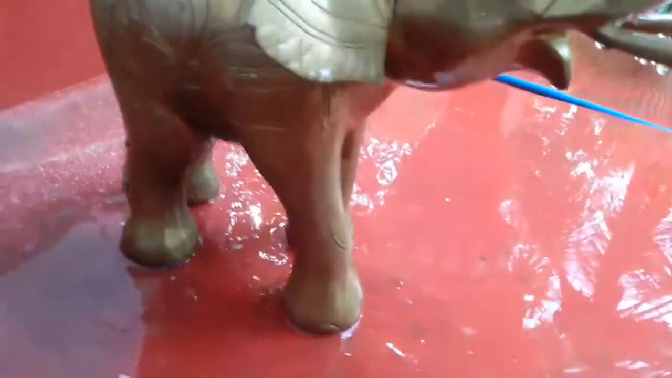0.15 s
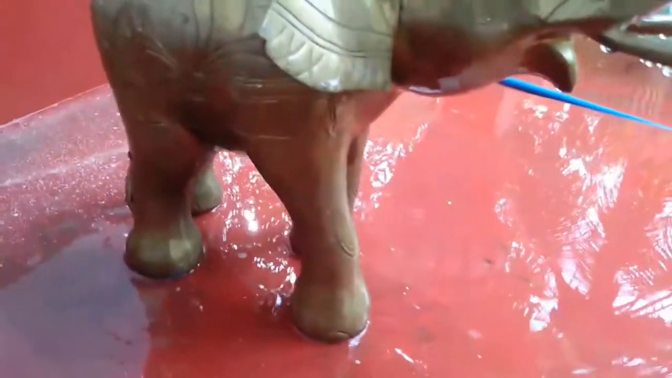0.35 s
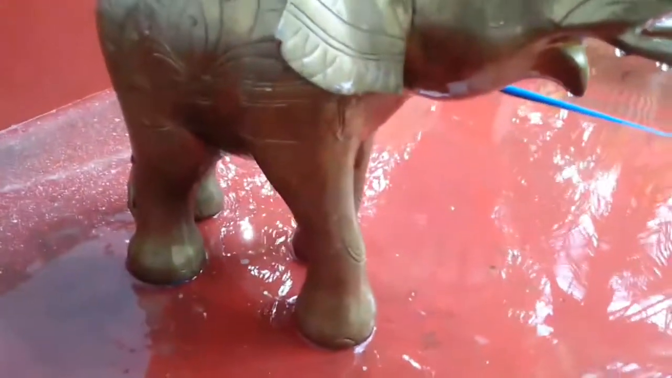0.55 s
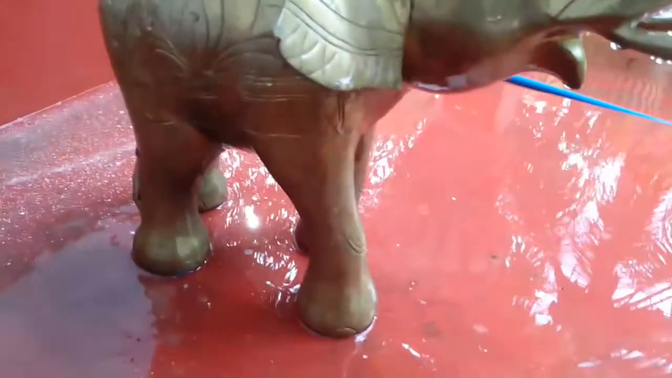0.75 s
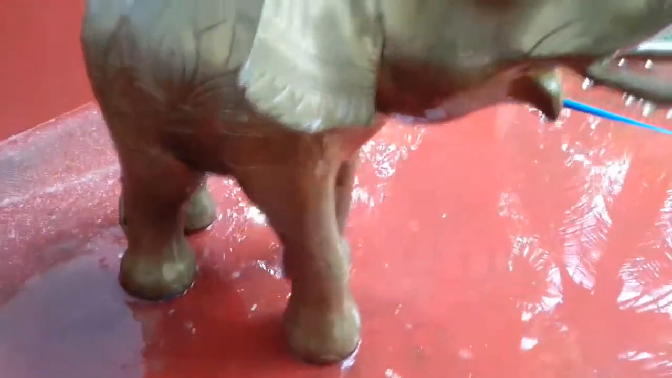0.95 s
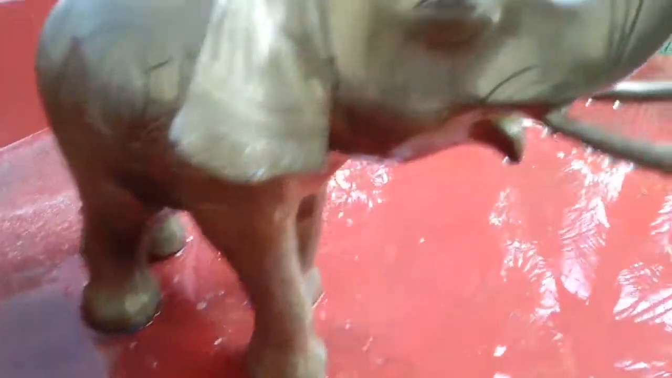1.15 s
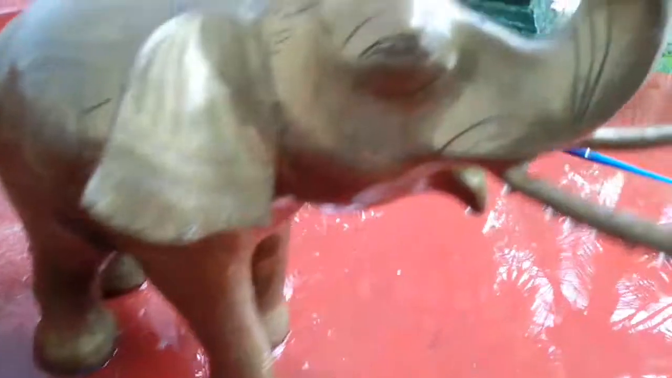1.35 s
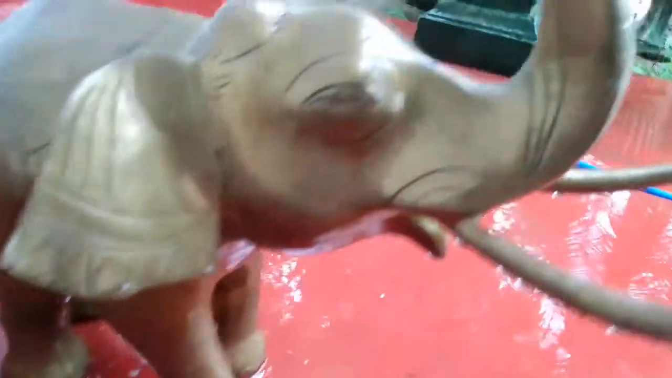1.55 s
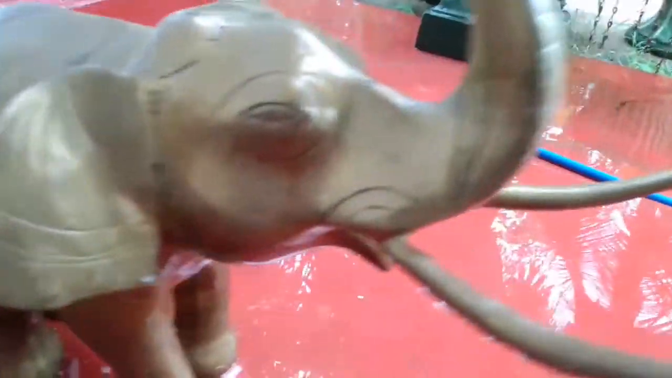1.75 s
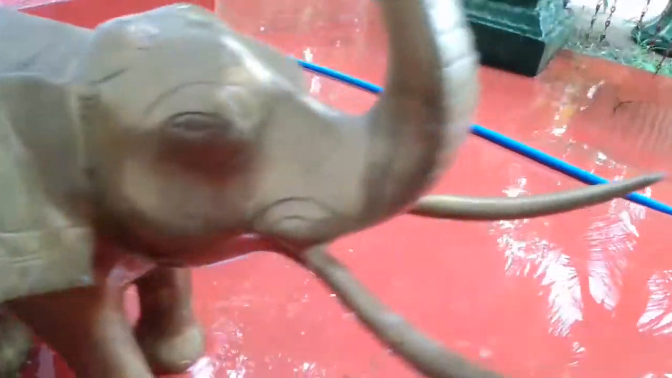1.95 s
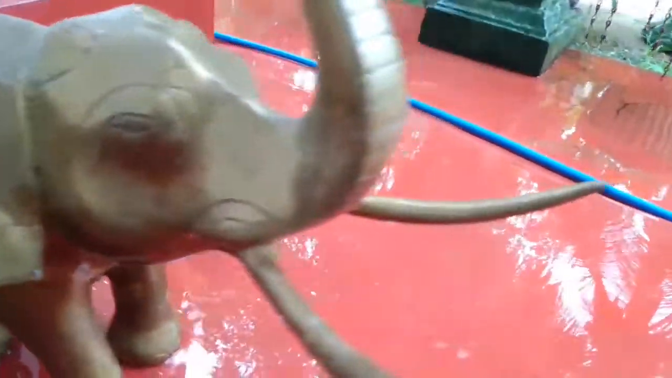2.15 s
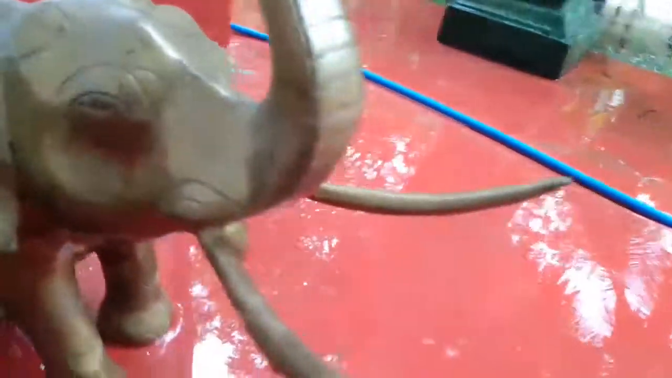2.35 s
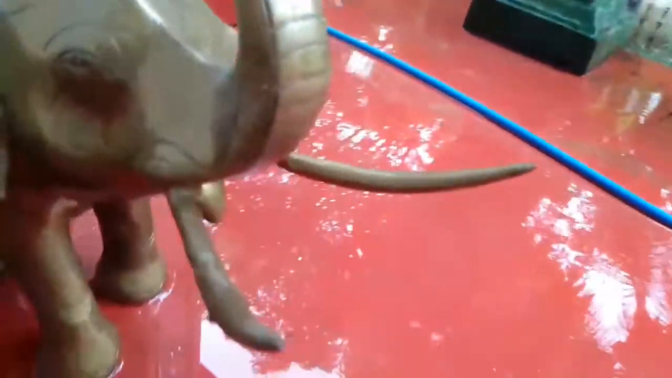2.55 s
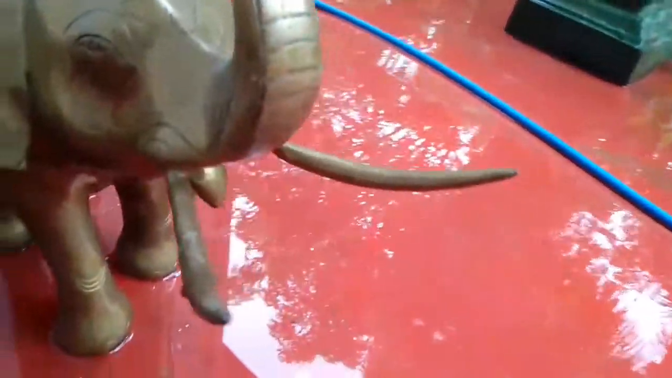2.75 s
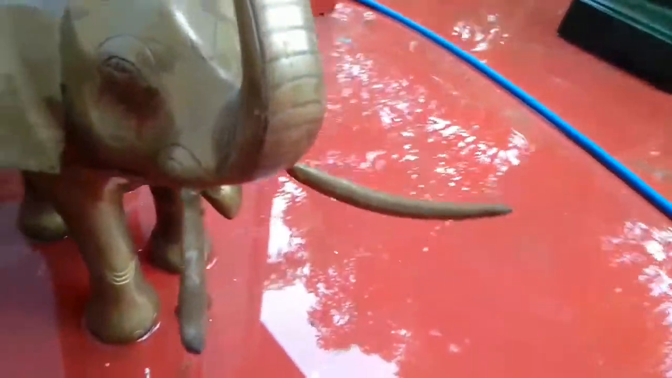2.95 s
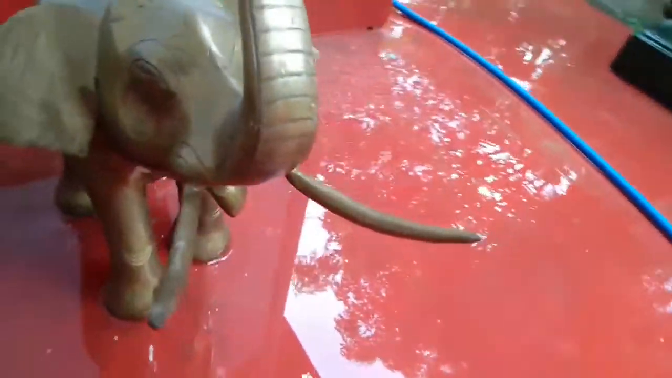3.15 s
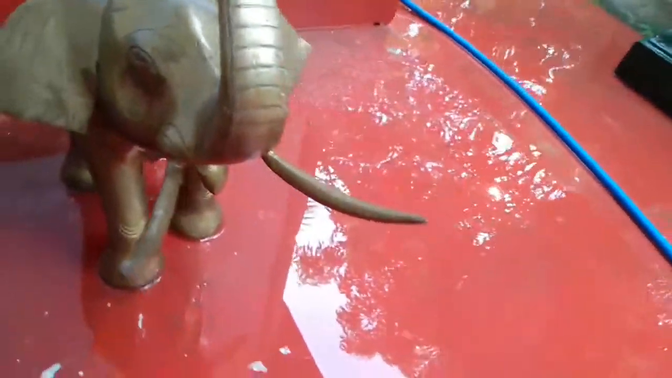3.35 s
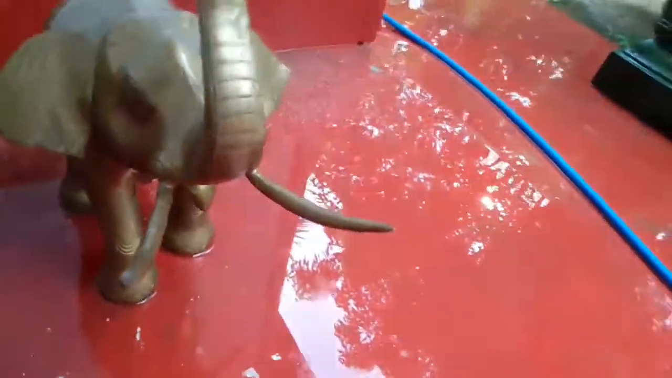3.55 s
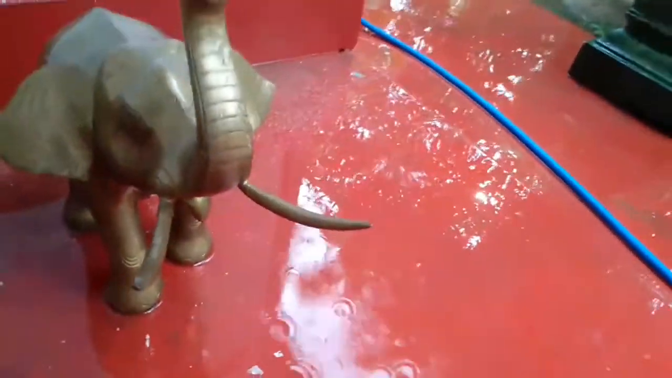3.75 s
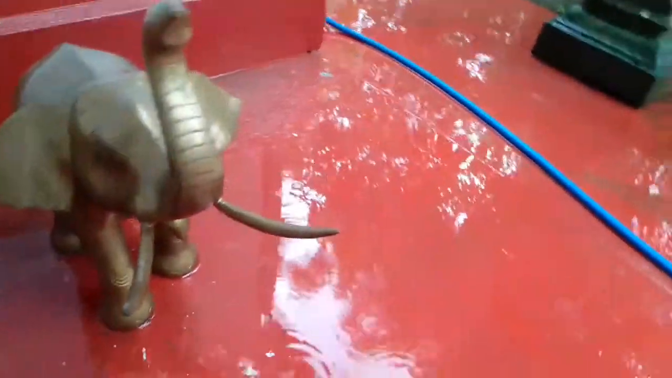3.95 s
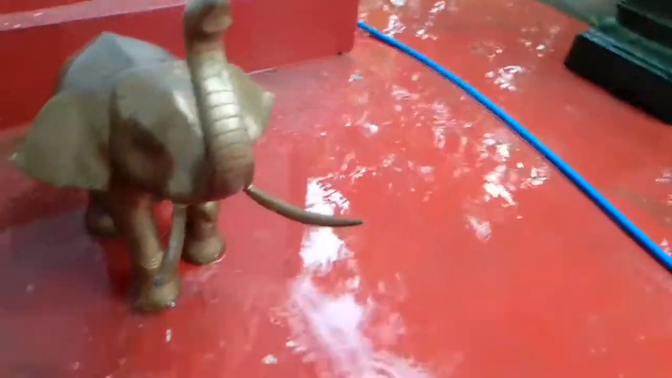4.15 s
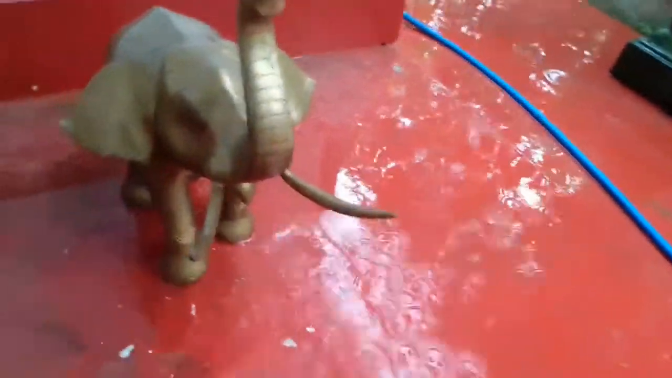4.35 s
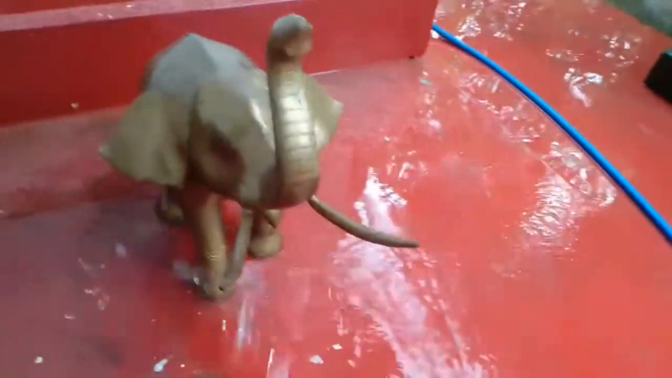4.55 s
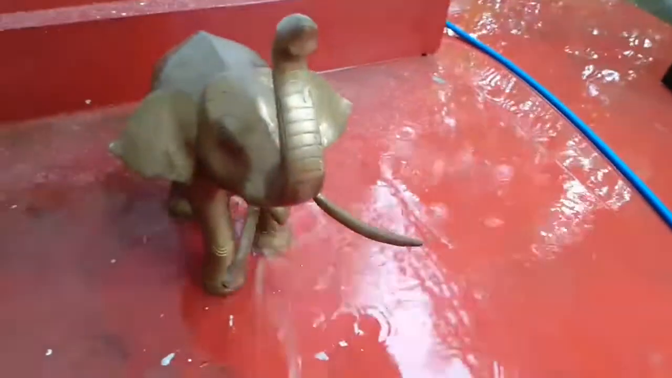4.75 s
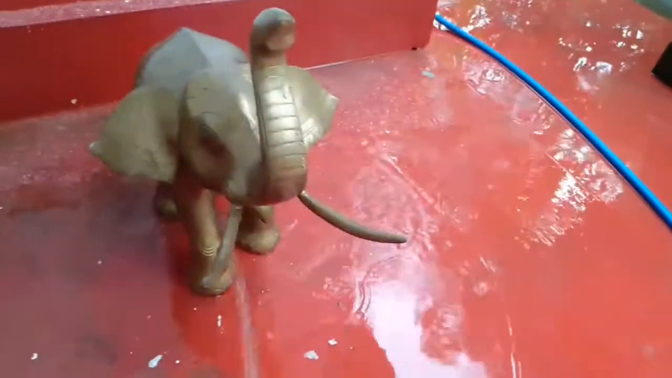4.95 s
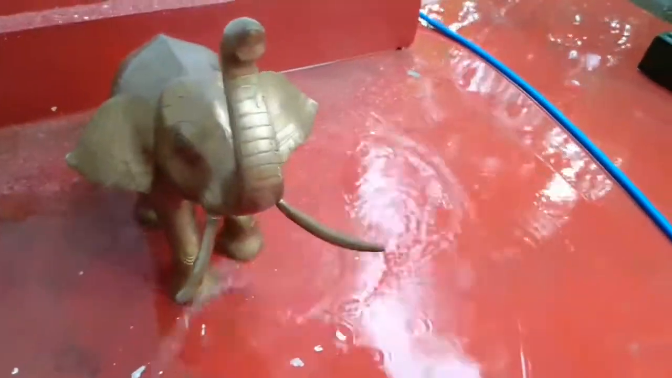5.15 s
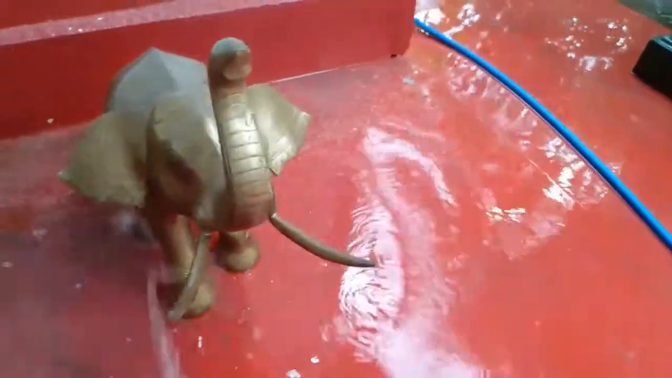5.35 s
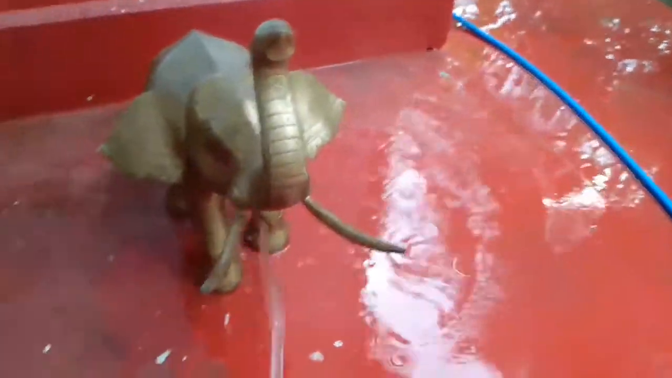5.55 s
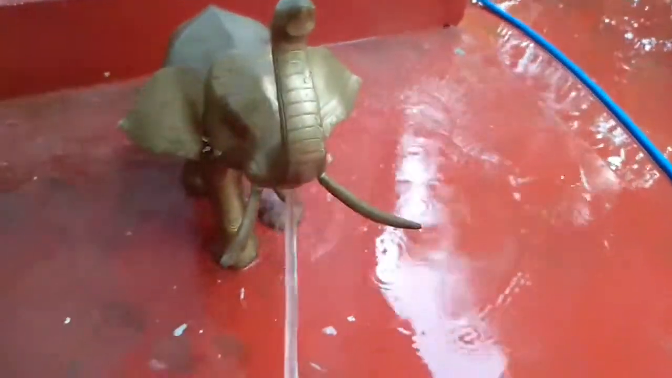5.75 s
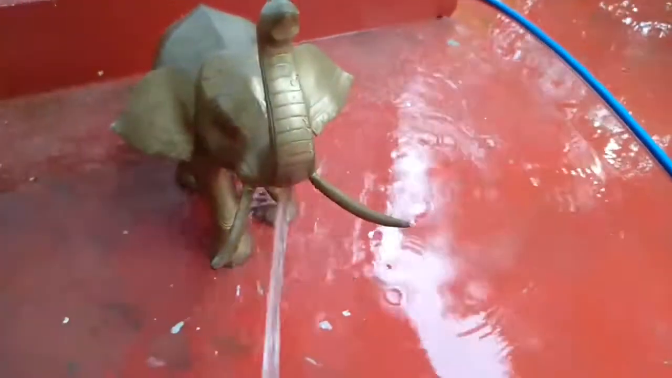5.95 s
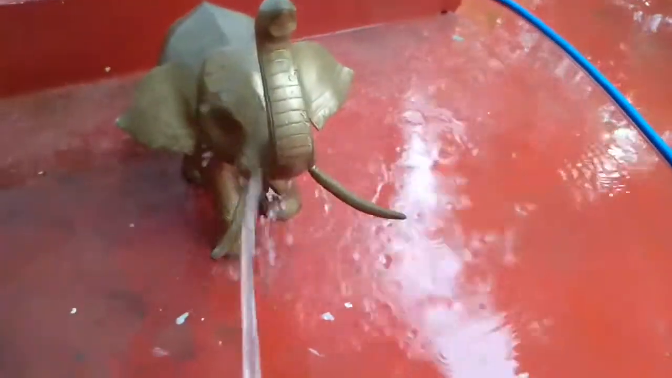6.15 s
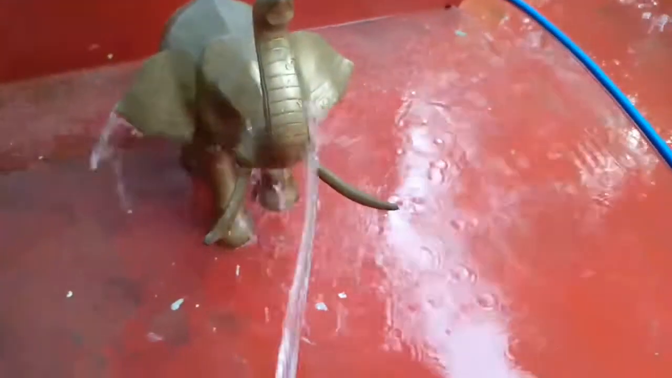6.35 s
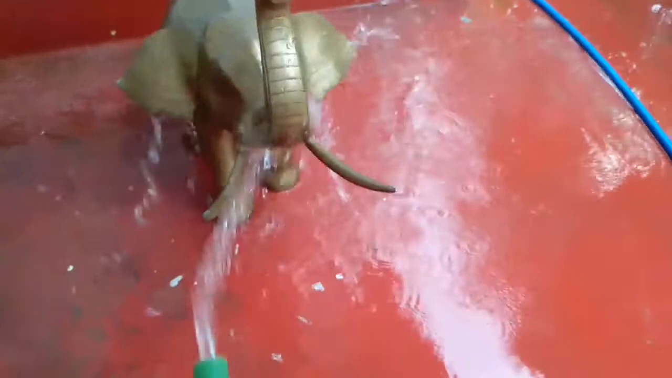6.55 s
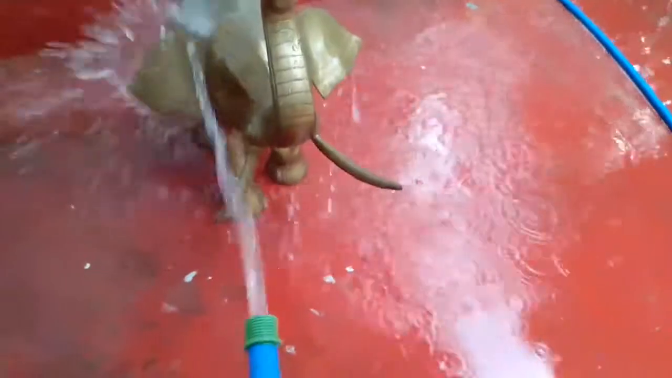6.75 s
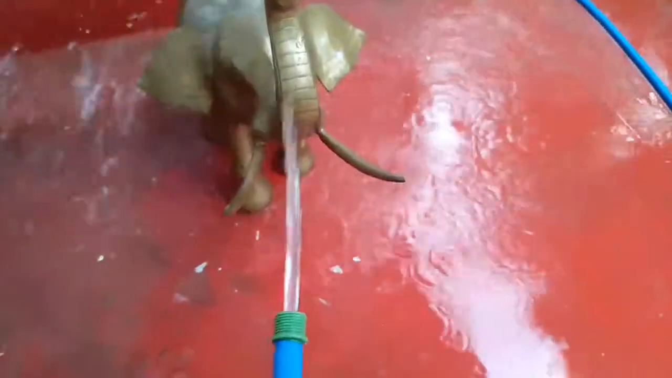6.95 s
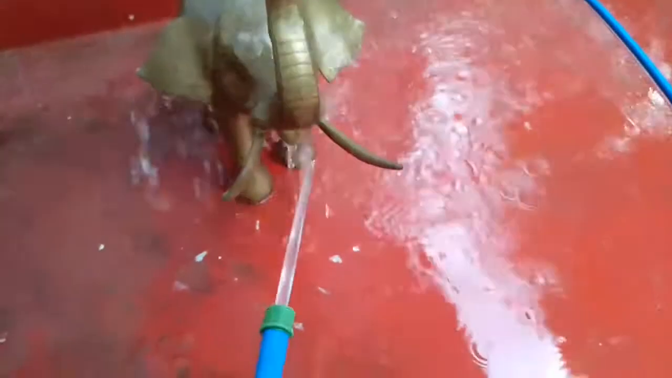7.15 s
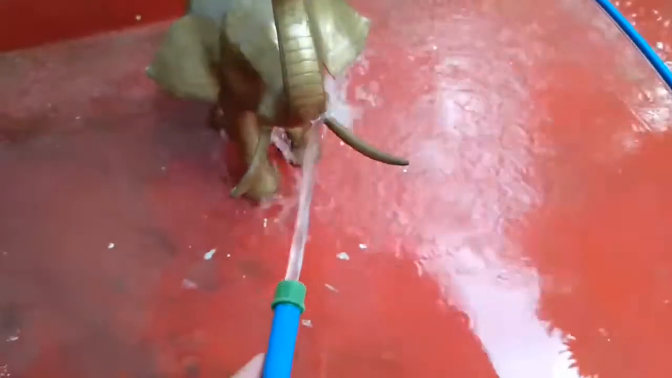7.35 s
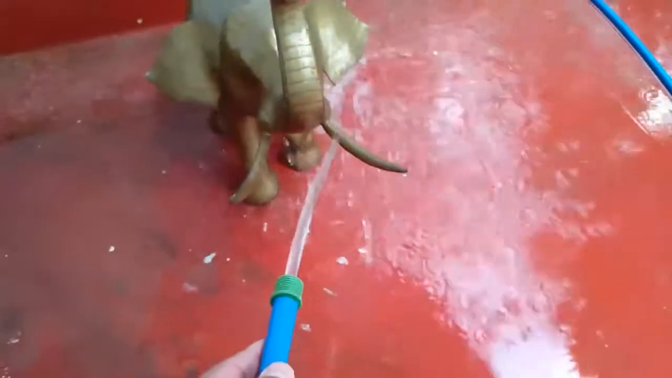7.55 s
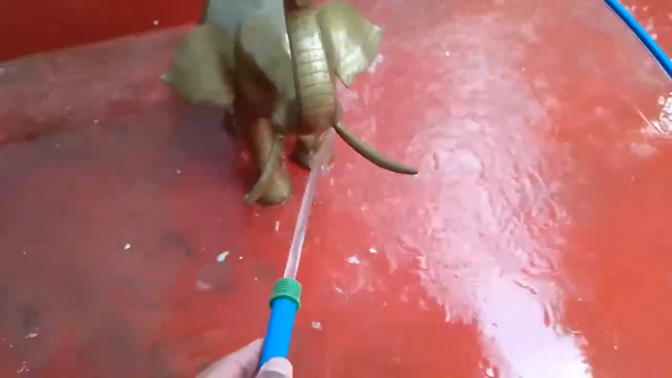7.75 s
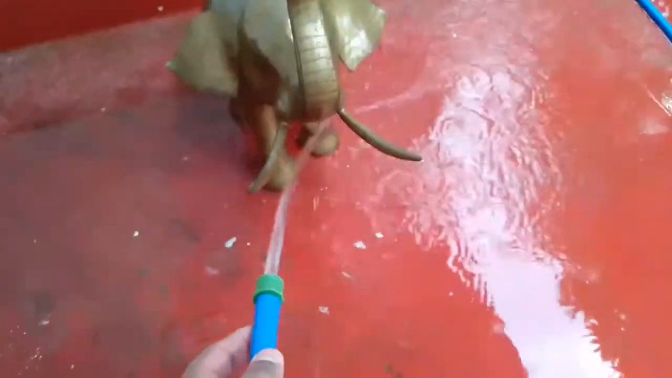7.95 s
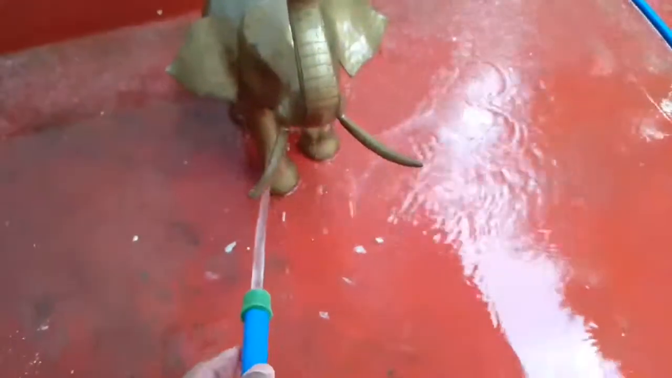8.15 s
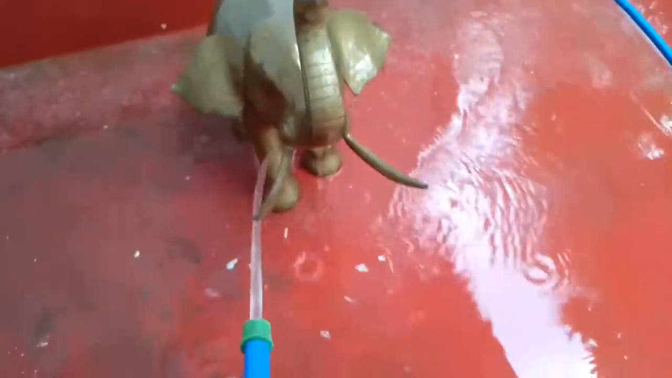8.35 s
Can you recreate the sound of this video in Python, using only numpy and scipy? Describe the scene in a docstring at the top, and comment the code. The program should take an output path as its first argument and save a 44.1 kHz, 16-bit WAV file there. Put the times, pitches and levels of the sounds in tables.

```python
"""A garden hose spits air and water, then plays on a metal statue and a wet porch floor.
Filtered random clicks make its hiss, sizzle, splash and patter; noise bursts make pops and slaps; sines ring as bubbles.
Insects trill and whine on narrow noise and a wavering sine, and a bird squeaks hoarsely, a falling whistle under noise.
A far horn, a wavering sine, sounds once over a low rumble, drone, hush, insect chorus and swells of filtered noise."""
import sys
import numpy as np
from scipy import signal
from scipy.fft import rfft, irfft, next_fast_len
from scipy.io import wavfile
from scipy.ndimage import uniform_filter1d

SR = 44100
rng = np.random.default_rng(int(sys.argv[2]) if len(sys.argv) > 2 else 0)


def unload_wav(signal):
    """Save mono or channel-first audio to the path in sys.argv[1] as 16-bit WAV at rate SR, clipped to [-1, 1]."""
    wavfile.write(
        sys.argv[1],
        SR,
        np.round(np.clip(np.atleast_2d(signal).T, -1, 1) * 32767).astype(np.int16),
    )


N = 374843
T = np.arange(N) / SR  # time in s

# Levels in the tables are relative: each source trims or modulates its own.
# bird notes: [t/s, length/s, final f/Hz, level/dB, top of the rasp f/Hz]
BIRD_NOTES = [(-.08, 0.088, 2680, -40.5, 3300), (1.062, 0.13, 2676, -45, 3470),
              (1.28, .16, 2700, -43.5, 3800), (1.506, 0.19, 2585, -43.5, 3580),
              (1.968, 0.18, 2314, -44, 3100), (2.561, 0.13, 2316, -45.5, 2720),
              (2.8, 0.11, 2384, -44.5, 2810), (7.084, 0.11, 2303, -61, 2660),
              (8.041, 0.094, 2466, -57, 2870)]
# trilling insect: [t/s, f/Hz, level/dB]
INSECT_TRILL = [(0, 5660, -59.5), (.5, 5820, -77), (1.1, 5580, -58), (1.9, 5480, -77), (2.95, 6000, -58),
                (3.35, 5556, -58), (4.1, 5765, -61.5), (7.1, 5685, -58), (8.5, 5570, -55.5)]
# second insect with a pure, thin note: [t/s, f/Hz, level/dB]
INSECT_WHINE = [(0, 5690, -71), (.9, 5670, -59.5), (1.4, 5580, -64), (3.3, 5750, -62.5), (4, 5684, -55.5),
                (6.4, 5600, -59.5), (7.2, 5670, -54), (8.5, 5490, -60.5)]
# outdoor hush, which the insect chorus follows: [t/s, level/dB]
HUSH_LEVEL = [(0, -6.5), (1.05, -4), (1.3, 3), (1.65, 1.5), (1.9, -6), (2.1, 1.5), (2.38, 1.5),
              (2.55, -4.5), (3.45, -5.5), (3.76, -13), (3.9, 7), (4.3, -2.5), (5.5, 1), (6.45, -4.5),
              (6.85, -1.5), (7.8, 1), (8.1, -8), (8.5, 1)]
# dull drone under the hush: [t/s, level/dB]
DRONE_LEVEL = [(0, -103), (1, -78), (1.3, -65), (5.5, -62), (6.6, -62), (8.5, -65)]
# soft low swells from far off: [t/s, length/s, centre f/Hz, width f/Hz, level/dB]
FAR_SWELLS = [(0.37, 0.81, 114.6, 70.6, -56.5), (2.25, 0.33, 476, 310, -60.5), (3.104, 0.22, 490, 87, -60),
              (2.8, 0.63, 350, 41, -66)]
# far horn: [t/s, f/Hz, level/dB]
HORN_NOTE = [(3.2, 1360, -81), (3.4, 1361, -70), (3.83, 1370, -64.5), (3.87, 1364, -47),
             (4.03, 1380, -50.5), (4.07, 1360, -59), (4.45, 1396, -60.5), (4.65, 1415, -72)]
# changing flow of the hose, spray and splash swell and fade: [t/s, nozzle spray level/dB, splash level/dB]
JET_FLOW = [(3.28, -60, -75), (3.42, -40, -77), (3.72, -47.5, -63), (3.85, -44.5, -53.5), (4.2, -69, -68.5),
            (4.53, -65, -80), (4.71, -42.5, -43), (5.1, -43, -45), (5.45, -49, -50.5), (5.9, -41, -49),
            (6.22, -40, -56.5), (6.43, -52.5, -65), (6.66, -33.5, -48), (7.04, -44, -58), (7.3, -45, -68),
            (7.47, -34, -44), (7.83, -31, -43.5), (8.15, -65.5, -64)]
# surges as trapped air drives the water out: [t/s, spray level/dB, splash level/dB, decay/s]
JET_SURGES = [(3.77, -47, -48.5, .06), (4.22, -60, -49.5, 0.087), (4.315, -45, -58.5, 0.039),
              (4.561, -44, -56, 0.16), (4.875, -39, -43.5, 0.15), (5.043, -36, -40, 0.024),
              (5.158, -36.5, -45, 0.089), (5.299, -28, -38.5, 0.041), (5.483, -30, -38.5, 0.068),
              (5.609, -35, -40.5, 0.039), (5.75, -32.5, -41, 0.033), (6.445, -37.5, -57, 0.034),
              (6.779, -43, -45.5, 0.19), (7.335, -36, -53, 0.11), (8.195, -36.5, -46.5, 0.39),
              (8.32, -48, -49, 0.074)]
# the stream sweeps over bare floor: [t/s, length/s, patter level/dB]
FLOOR_SWEEPS = [(4.0, 0.079, -47.5), (4.23, 0.15, -57.5), (4.637, 1.34, -48), (6.793, .24, -50),
                (7.456, 0.25, -57), (8.37, .14, -50.5)]
# air pockets popping at the nozzle: [t/s, level/dB]
AIR_POPS = [(3.5302, -22), (3.5568, -13), (3.652, -17.5), (3.7795, -9.5), (4.0498, -20), (4.6812, -11),
            (4.805, -15), (4.8206, -5.5), (5.175, -14), (5.3013, -20), (6.0765, -14.5), (6.177, -16),
            (6.2457, -13), (6.3924, -21), (6.4463, -14.5), (6.5691, -13.5), (6.6751, -11), (6.7825, -10.5),
            (6.962, -24), (7.108, -16.5), (7.2835, -21), (7.344, -17.5), (7.4054, -9), (7.5824, -11.5),
            (7.703, -9.5), (8.2012, -12), (8.3274, -8)]
# slugs of water landing: [t/s, level/dB, cavity f/Hz]
WATER_SLUGS = [(3.775, -25, 3100), (4.2248, -31, 3540), (4.243, -25.5, 4240), (4.6187, -29, 2800),
               (4.6527, -23.5, 2660), (4.6844, -21, 3580), (4.699, -21.5, 1560), (4.772, -24, 2900),
               (4.8238, -15, 2720), (4.8615, -18.5, 3200), (4.883, -23.5, 1390), (4.9094, -20.5, 5040),
               (5.054, -23, 1810), (5.1777, -26, 2400), (5.3209, -20, 2760), (5.5162, -14, 3220),
               (5.607, -20.5, 2570), (5.7593, -22, 2600), (5.771, -22, 1770), (6.279, -31, 3540),
               (6.4768, -29.5, 3550), (6.6447, -29, 3700), (6.7116, -16.5, 3120), (6.788, -18, 3920),
               (6.913, -26, 3560), (7.464, -23, 2780), (7.712, -20, 3200), (7.8344, -24.5, 3470),
               (8.441, -27.5, 1210)]
# spectrum of the far rumble: [f/Hz, level/dB]
RUMBLE_COLOUR = [(20, -30), (50, -3.5), (65, -5.5), (76, 4.5), (90, -3.5), (150, -8), (210, -11),
                 (280, -33.5), (420, -36), (900, -30.5)]
# spectrum of the drone: [f/Hz, level/dB]
DRONE_COLOUR = [(100, -4.5), (200, 2), (300, 5.5), (350, -2.5), (420, -26), (900, -45.5)]
# spectrum of the hush: [f/Hz, level/dB]
HUSH_COLOUR = [(100, -3), (450, -4), (1000, -10), (1600, -8.5), (2300, 2.5), (3200, -3.5), (4600, -15),
               (7000, -8.5), (8500, -34), (10500, -30), (12000, -8), (13500, -39), (16000, -62)]
# spectrum of the insect chorus: [f/Hz, level/dB]
CHORUS_COLOUR = [(4900, -48.5), (5080, -1), (5220, 1.5), (5750, 8.5), (6100, 3.5), (6450, -1), (6750, 4),
                 (6950, -46), (7800, -32)]
# spectrum of air hissing at the nozzle: [f/Hz, level/dB]
AIR_COLOUR = [(3000, -27), (9000, -21.5), (10500, -18), (11400, -1.5), (12200, 1.5), (14600, -8),
              (15600, -11.5)]
# spectrum of spray at the nozzle: [f/Hz, level/dB]
SIZZLE_COLOUR = [(3000, -29), (7500, -20.5), (9300, -9.5), (10700, -4.5), (12100, 2), (13900, -7.5),
                 (15600, -9)]
# spectrum of splashing drops: [f/Hz, level/dB]
SPLASH_COLOUR = [(700, -26), (1600, -15), (2250, -2.5), (2900, 0), (4000, -4), (5300, -3.5), (7200, -7.5),
                 (10000, -14), (15000, -24)]
# spectrum of drops on the floor: [f/Hz, level/dB]
PATTER_COLOUR = [(150, -24), (320, -2.5), (800, -1), (1750, 5), (2500, 3.5), (5000, -45)]

NOTE_START = 1.12  # bird notes glide down from this multiple of their final pitch
SURGE_ATTACK_S, SURGE_HOLD_S = 0.005, 0.031
FLOOR_ATTACK_S, FLOOR_DECAY_S = 0.038, 0.069
SURGE_PATTER_DB = -35.5  # a surge that splashes this loudly doubles the patter


def undb(db):
    """Decibels to gain."""
    return 10 ** (np.asarray(db) / 20)


def unit(x):
    """Scale to rms 1."""
    return x / np.sqrt(np.mean(x ** 2) + 1e-20)


def curves(table):
    """The columns of a table, joined by lines in time."""
    s, *columns = np.transpose(table)
    return [np.interp(T, s, column) for column in columns]


def add(out, s, x):
    """Mix x into out from time s; a negative start trims the head of x."""
    i = int(s * SR)
    x, i = x[max(-i, 0):], max(i, 0)
    out[i:i + len(x)] += x[:max(N - i, 0)]


def gate(s, length, attack_s, decay_s):
    """Rise from time s, hold until the length is over, then die away."""
    rise = np.clip((T - s) / attack_s, 0, 1)
    return rise * np.exp(-np.maximum(T - s - length, 0) / decay_s)


def walk(rate):
    """Slow chance with a spread near 1."""
    k = int(SR / rate)
    steps = np.repeat(rng.standard_normal(N // k + 1), k)
    return unit(uniform_filter1d(steps, k)[:N])


def clicks(rate, spread_db):
    """Random impacts, rate per second; a positive spread makes a few large, a negative one a few faint."""
    size = undb(spread_db * np.minimum(rng.exponential(size=N), 5))
    return (rng.random(N) < rate / SR) * size * rng.choice([-1, 1], N)


def colour(x, points, size=4096):
    """Minimum-phase filter through (Hz, dB) points; the result has rms 1."""
    hz, db = np.transpose(points)
    bins = np.fft.rfftfreq(size, 1 / SR) + 1
    log_gain = np.log(undb(np.interp(np.log(bins), np.log(hz), db)))
    # folding the cepstrum onto positive time makes the filter causal
    cepstrum = irfft(log_gain)[:size // 2]
    cepstrum[1:] *= 2
    response = irfft(np.exp(rfft(cepstrum, size)))
    return unit(signal.fftconvolve(x, response)[:len(x)])


def resonate(x, hz, q):
    """One resonance."""
    return signal.lfilter(*signal.iirpeak(min(hz, SR / 2 - 2000), max(q, 1), fs=SR), x)


def band(lo_hz, hi_hz):
    """Noise between two steep edges, rms 1."""
    edges = [lo_hz, max(hi_hz, lo_hz + 10)]
    sos = signal.butter(8, edges, "bandpass", fs=SR, output="sos")
    return unit(signal.sosfilt(sos, rng.standard_normal(N)))


def gliding_noise(hz, half_width_hz):
    """Narrow noise that follows a moving pitch: slow noise carried by a cosine and a sine."""
    sos = signal.butter(2, half_width_hz, fs=SR, output="sos")
    ring = signal.sosfilt(sos, rng.standard_normal((2, N)))
    phase = 2 * np.pi * np.cumsum(hz) / SR
    return ring[0] * np.cos(phase) + ring[1] * np.sin(phase)


def tone(table, waver, flutter_db):
    """A thin sine on rows of (s, Hz, dB), slightly unsteady in pitch and level."""
    hz, db = curves(table)
    unsteady_hz = hz * (1 + waver * walk(40))
    wave = np.sqrt(2) * np.sin(2 * np.pi * np.cumsum(unsteady_hz) / SR)
    return wave * undb(db + flutter_db * walk(25))


def echo(x, t60):
    """Diffuse reflections: a fading noise tail with unit energy; t60 in s."""
    t = T[:SR * 2]
    fade = np.exp(-np.log(1000) * t / t60)
    onset = 1 - np.exp(-t / 0.004)
    tail = rng.standard_normal(len(t)) * fade * onset
    return signal.fftconvolve(x, tail / np.linalg.norm(tail))[:N]


def bird(fall=4.51, rough=0.023, rasp_db=-3.0, direct_db=-6, echo_db=-2):
    """Hoarse squeaks: a whistle that sags onto its last pitch under a rasp, heard mostly by reflection."""
    out, waver = np.zeros(N), walk(500)
    for s, length, end_hz, db, top_hz in BIRD_NOTES:
        u = np.linspace(0, 1, int(length * SR))  # progress through the note
        sag = 1 + (NOTE_START - 1) * np.exp(-fall * u)
        hz = end_hz * sag * (1 + rough * waver[int(abs(s) * SR):][:len(u)])
        whistle = np.sqrt(2) * np.sin(2 * np.pi * np.cumsum(hz) / SR)
        arch = np.abs(np.sin(np.pi * u))
        rasp = np.sqrt(arch) * np.exp(-.5 * u) * band(end_hz, top_hz)[:len(u)]
        add(out, s, undb(db + 4.5) * arch ** 0.36 * (whistle + undb(rasp_db) * rasp))
    return undb(direct_db) * out + undb(echo_db) * echo(out, t60=0.69)


def insect(half_width_hz=100, pulse_hz=95, depth=0.59):
    """A narrow resonance pulsed by quick strokes; its pitch wanders."""
    hz, db = curves(INSECT_TRILL)
    stroke_hz = pulse_hz * (1 + 0.0998 * walk(27))
    strokes = 1 + depth * np.sin(2 * np.pi * np.cumsum(stroke_hz) / SR)
    return unit(strokes * gliding_noise(hz, half_width_hz)) * undb(db - 1.0)


def whine():
    """A second insect: a pure, thin sine whose pitch wavers and level flutters."""
    return tone(INSECT_WHINE, waver=.003, flutter_db=3.5)


def outdoors(rumble_db=-60):
    """Filtered noise: steady distant rumble, dull drone, soft hush and a chorus of farther insects."""
    (hush_db,), (drone_db,) = curves(HUSH_LEVEL), curves(DRONE_LEVEL)
    rumble = colour(rng.standard_normal(N), RUMBLE_COLOUR) * undb(rumble_db)
    drone = colour(rng.standard_normal(N), DRONE_COLOUR) * undb(drone_db)
    hush = colour(rng.standard_normal(N), HUSH_COLOUR) * undb(hush_db - 56.0 + 0.14 * walk(14))
    chorus = colour(rng.standard_normal(N), CHORUS_COLOUR) * undb(hush_db - 57.5 + 1.2 * walk(30))
    return rumble + drone + hush + chorus


def swells():
    """Narrow bands of low noise that rise and fade."""
    out = np.zeros(N)
    for s, length, hz, width, db in FAR_SWELLS:
        arch = np.sin(np.pi * np.clip((T - s) / length, 0, 1))
        out += band(hz - width / 2, hz + width / 2) * arch * undb(db)
    return out


def horn():
    """One held note from far away: a sine, unsteady in pitch and level."""
    sounding = (T > HORN_NOTE[0][0]) * (T < HORN_NOTE[-1][0])
    return tone(HORN_NOTE, waver=0.0033, flutter_db=2.0) * undb(-6.5) * sounding


def lumps(x, lump_db=2.5, rate=70):
    """Uneven water: each pitch range of the sound swells and fades on its own."""
    edges_hz = np.geomspace(1000, 8000, 7)
    size = next_fast_len(N)
    hz, spectrum = np.fft.rfftfreq(size, 1 / SR), rfft(x, size)
    out = np.zeros(N)
    for k in range(len(edges_hz) + 1):
        part = irfft(spectrum * (np.digitize(hz, edges_hz) == k), size)[:N]
        out += part * undb(lump_db * walk(rate))
    return unit(out)


def bubbles(centre_hz=3100, octaves=0.332, cycles=21, rise=0.074, spread_db=4.0, count=1100):
    """Trapped bubbles ring briefly and rise in pitch as they surface."""
    out, t = np.zeros(N), T[:SR // 25]
    draws = zip(rng.random(count), rng.standard_normal(count), rng.exponential(size=count))
    for when, pitch, size in draws:
        hz = min(centre_hz * 2 ** (octaves * max(pitch, -1.6)), SR / 5)
        age = t * hz / cycles
        ring = np.exp(-2 * age) * np.sin(2 * np.pi * hz * t * (1 + rise * age / 2))
        add(out, when * N / SR, undb(spread_db * min(size, 3)) * ring)
    return unit(out)


def jet():
    """Air hisses out first; then spray crackles at the nozzle, and drops splash on the statue and patter on the floor."""
    spray_db, splash_db = curves(JET_FLOW)
    surge_spray, surge_splash = np.zeros(N), np.zeros(N)
    for s, surge_spray_db, surge_splash_db, decay_s in JET_SURGES:
        shape = gate(s, SURGE_HOLD_S, SURGE_ATTACK_S, decay_s)
        surge_spray += shape * undb(surge_spray_db)
        surge_splash += shape * undb(surge_splash_db)
    # flow and surges add as powers
    spray = np.hypot(undb(spray_db), surge_spray)
    mass = np.hypot(undb(splash_db), surge_splash)
    on_floor = sum(gate(s, length, FLOOR_ATTACK_S, FLOOR_DECAY_S) * undb(db) for s, length, db in FLOOR_SWEEPS)
    on_floor = on_floor * (1 + surge_splash / undb(SURGE_PATTER_DB))

    air = colour(clicks(rate=5000, spread_db=4.0), AIR_COLOUR) * spray
    sizzle = colour(clicks(rate=3400, spread_db=3), SIZZLE_COLOUR) * spray * undb(0.15)
    splash = lumps(colour(clicks(rate=4000, spread_db=2.5), SPLASH_COLOUR)) * mass * undb(1.55)
    ringing = bubbles() * mass * undb(-5.0)
    patter = lumps(colour(clicks(rate=1800, spread_db=-1.5), PATTER_COLOUR)) * on_floor * undb(-5.5)

    flowing = np.clip((T - 3.27) / 0.06, 0, 1)
    wet = np.clip((T - 3.765) / .01, 0, 1)  # crossfade from air to water
    sputter = undb(2.43 * walk(110))  # the stream breaks up unevenly
    return flowing * sputter * ((1 - wet) * air + wet * (sizzle + splash + ringing + patter))


def pops(hz=11800, spray_s=0.0045, spray_db=-10):
    """An air pocket bursts with a sharp, thin tick and a short puff of spray; each has its own pitch."""
    out, t = np.zeros(N), T[:SR // 20]
    thin = signal.butter(4, 7800, "highpass", fs=SR, output="sos")
    for s, db in AIR_POPS:
        fade = np.exp(-t / .0007) + undb(spray_db) * np.exp(-t / spray_s)
        burst = rng.choice([-1, 1], len(t)) * fade
        pitch_hz = hz * (1 + .06 * rng.standard_normal())
        tick = signal.sosfilt(thin, resonate(burst, pitch_hz, q=3))
        add(out, s, undb(db) * tick / np.abs(tick).max())
    return out * undb(-3.0)


def slugs(slap_db=-6, decay_s=.01, spray_s=0.016, spray_db=-7):
    """A slug slaps into the water film: its cavity rings and fine spray flies off."""
    out, t = np.zeros(N), T[:SR // 8]
    for s, db, hz in WATER_SLUGS:
        impact, mist = rng.standard_normal((2, len(t)))
        slap = colour(impact, SPLASH_COLOUR)
        cavity = unit(resonate(slap, hz, q=5.9))
        body = (cavity + undb(slap_db) * slap) * np.exp(-t / decay_s)
        spray = colour(mist, SIZZLE_COLOUR) * np.exp(-t / spray_s) * undb(spray_db)
        add(out, s, undb(db) * (body + spray) / np.abs(body).max())
    return out * undb(-3.0)


def gurgle(start_s=7.27, length=0.25, from_hz=2450, to_hz=2950, half_width_hz=260, db=-44):
    """The stream fills a small hollow, whose resonance swells and rises."""
    hz = np.interp(T, [start_s, start_s + length], [from_hz, to_hz])
    swell = gate(start_s, length, length, decay_s=0.015)
    return unit(gliding_noise(hz, half_width_hz)) * swell * undb(db)


def scene():
    """Water close by under the porch roof, everything else beyond it."""
    # the level of the jet and the garden dips briefly
    lull = undb(np.interp(T, [6.515, 6.535, 6.6, 6.66], [0, -16, -13.5, 0.0]))
    garden = bird() + insect() + whine() + outdoors() + swells() + horn()
    water = lull * jet() + pops() + slugs() + gurgle()
    porch = undb(-9.5) * echo(water, t60=0.15)
    return (water + porch + lull * garden)[None]


def record(dry, ceiling=.3, top_hz=15700):
    """A soft ceiling rounds the sharpest peaks, then a steep low-pass cuts the top."""
    rounded = ceiling * np.tanh(dry / ceiling)
    return signal.sosfilt(signal.ellip(10, .2, 70, top_hz, fs=SR, output="sos"), rounded)


dry = scene()
out = record(dry)
unload_wav(out)
```